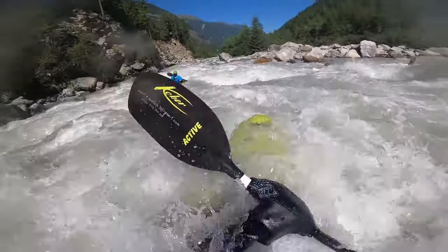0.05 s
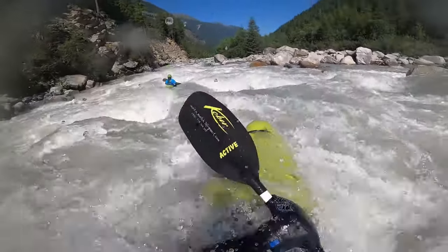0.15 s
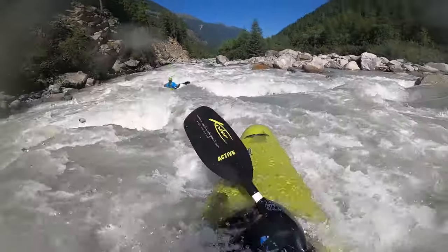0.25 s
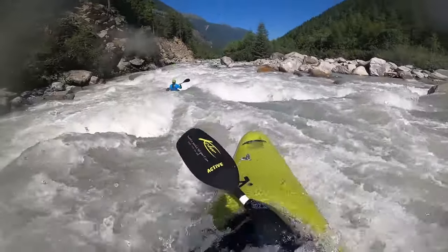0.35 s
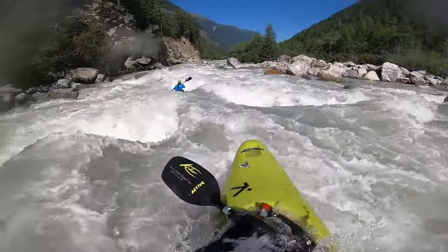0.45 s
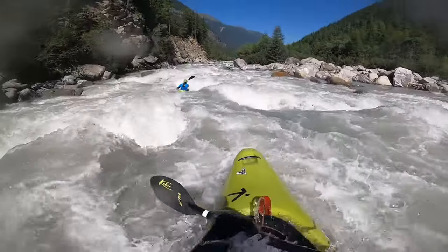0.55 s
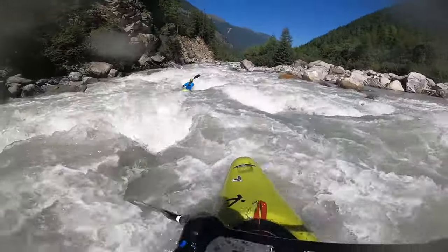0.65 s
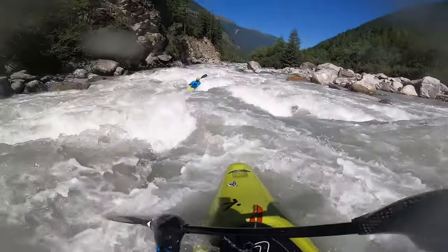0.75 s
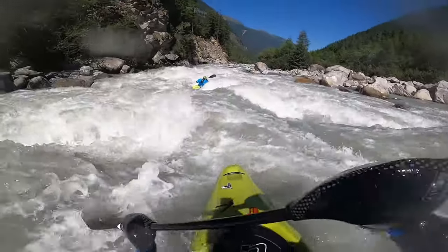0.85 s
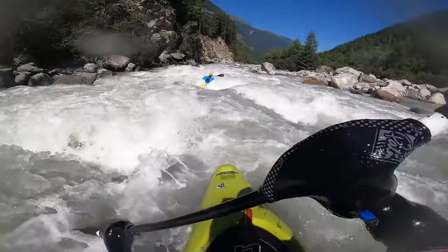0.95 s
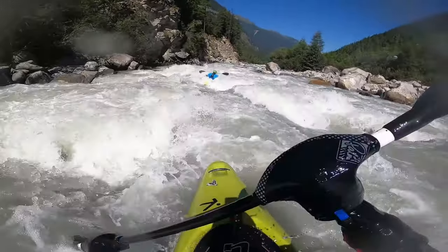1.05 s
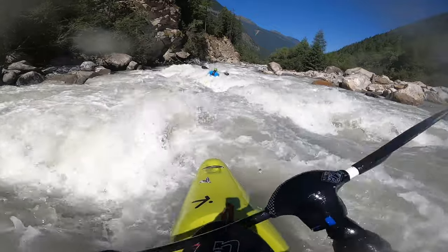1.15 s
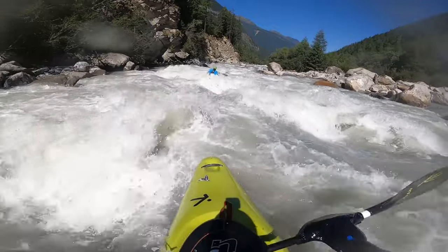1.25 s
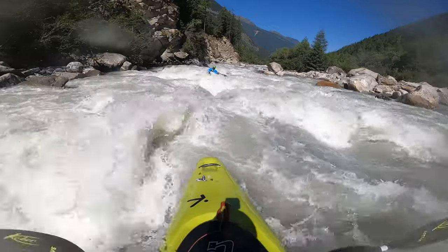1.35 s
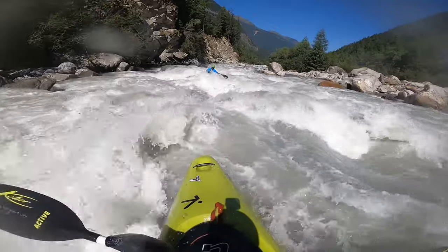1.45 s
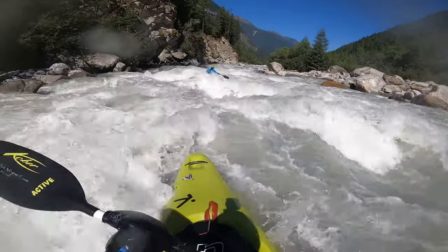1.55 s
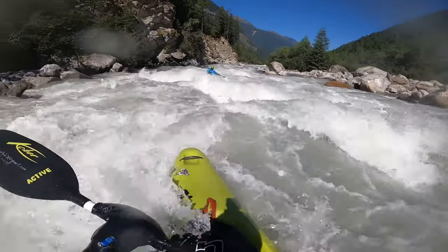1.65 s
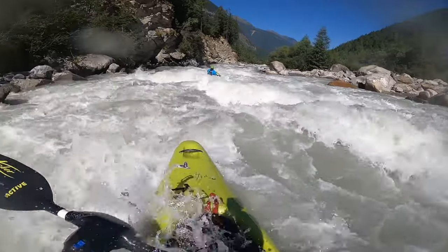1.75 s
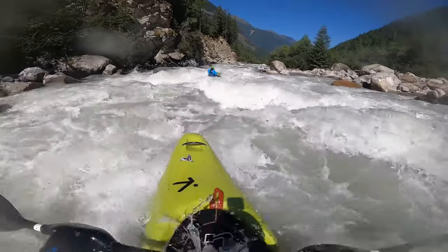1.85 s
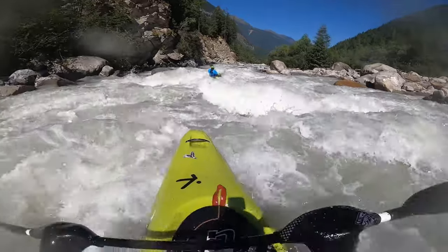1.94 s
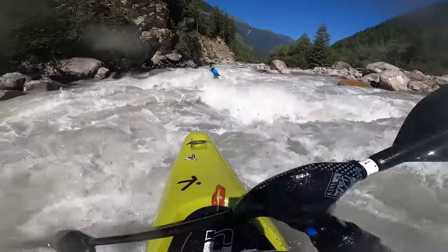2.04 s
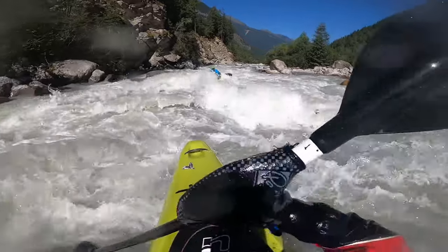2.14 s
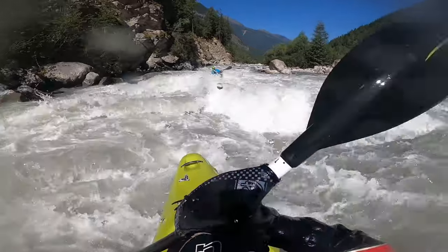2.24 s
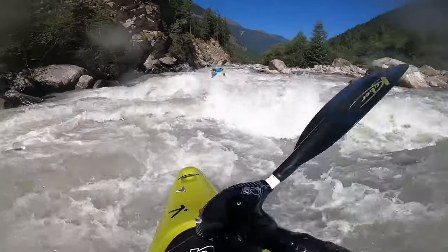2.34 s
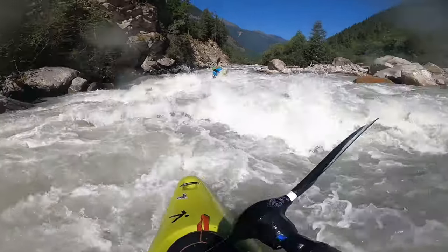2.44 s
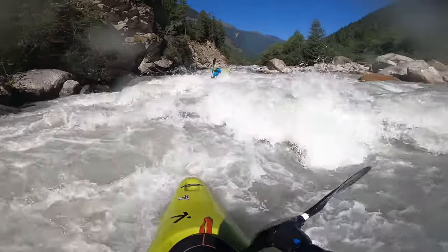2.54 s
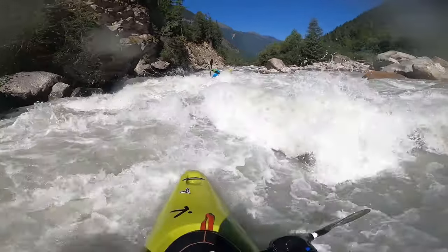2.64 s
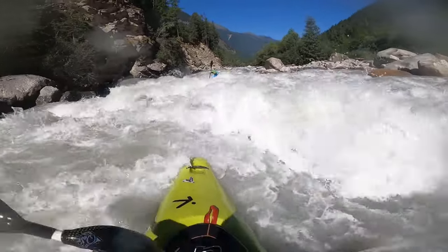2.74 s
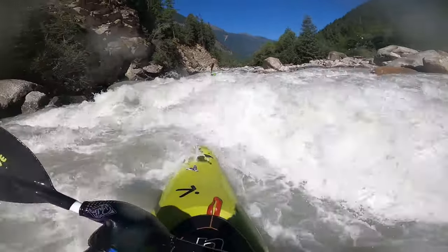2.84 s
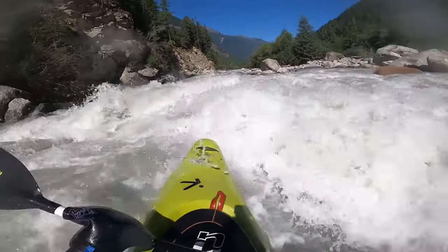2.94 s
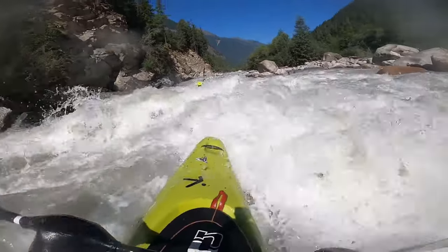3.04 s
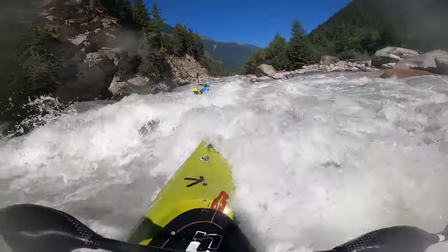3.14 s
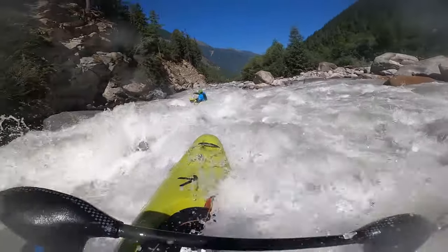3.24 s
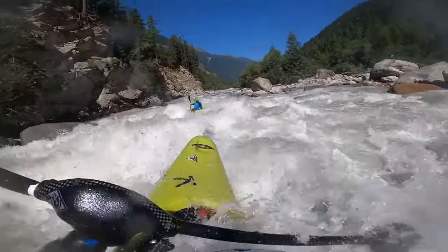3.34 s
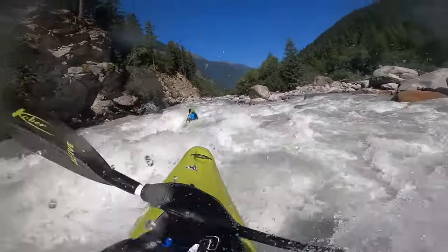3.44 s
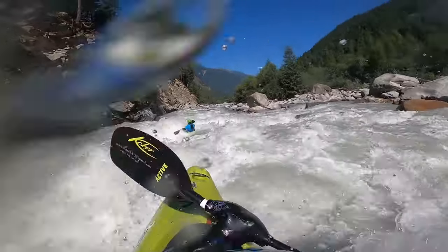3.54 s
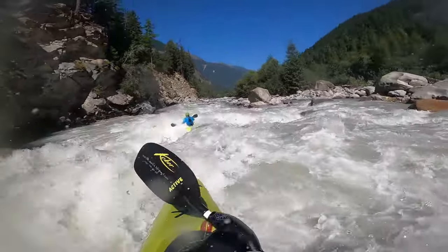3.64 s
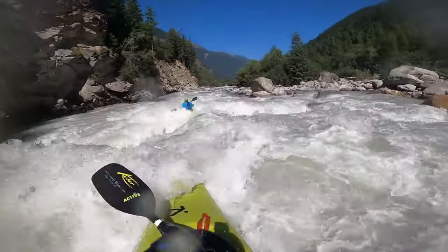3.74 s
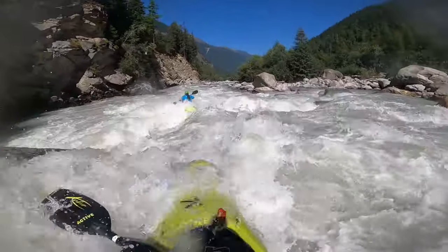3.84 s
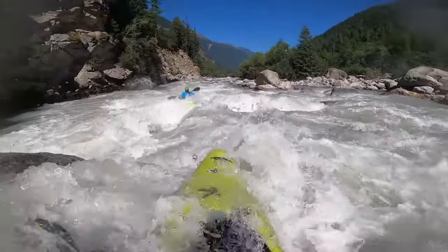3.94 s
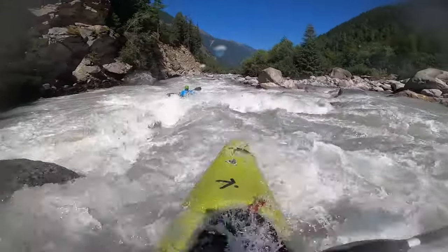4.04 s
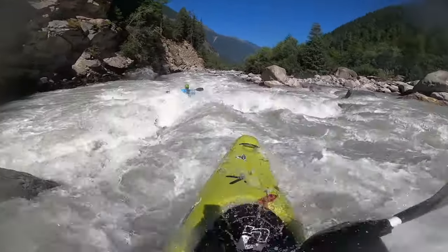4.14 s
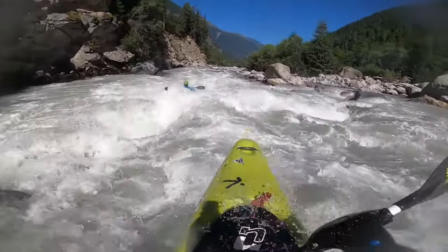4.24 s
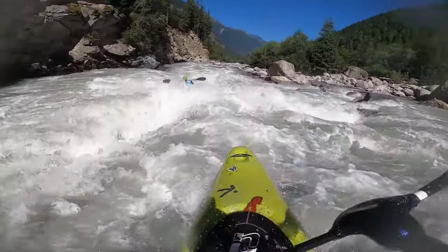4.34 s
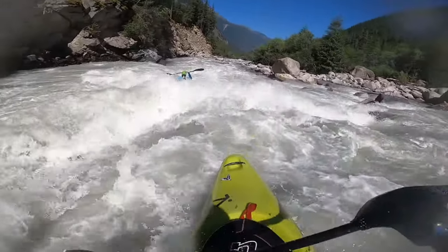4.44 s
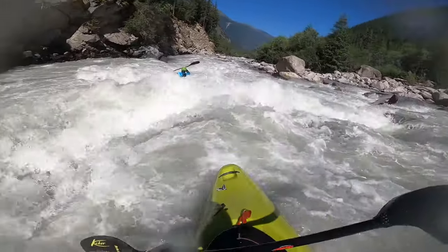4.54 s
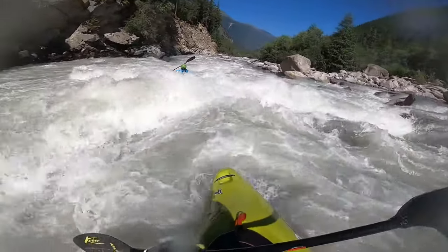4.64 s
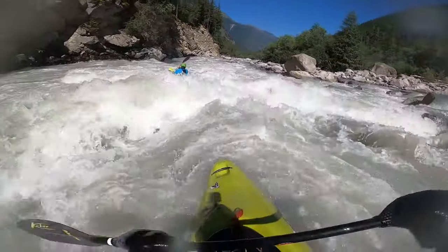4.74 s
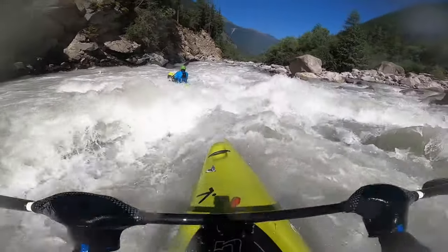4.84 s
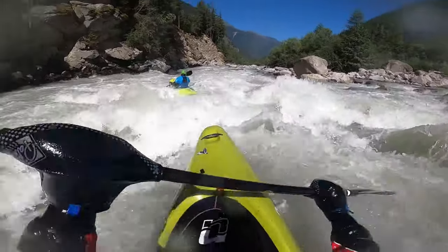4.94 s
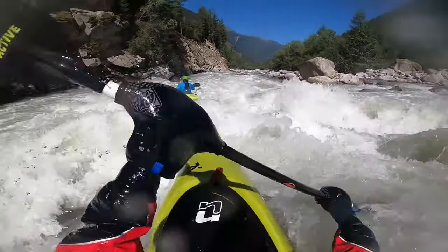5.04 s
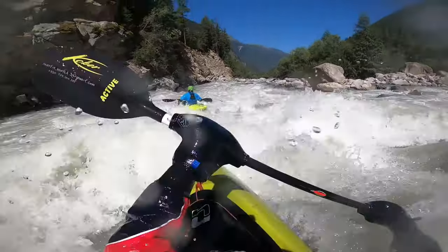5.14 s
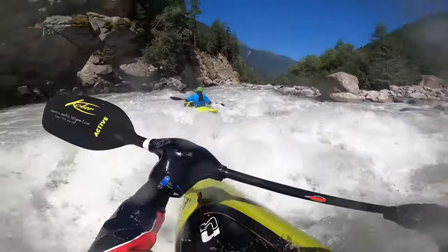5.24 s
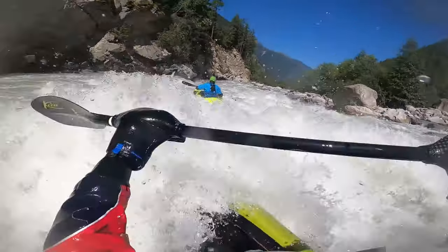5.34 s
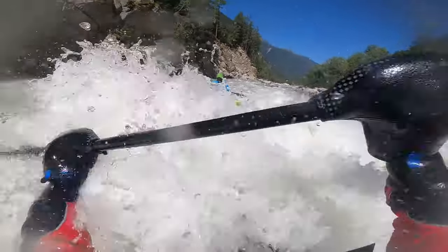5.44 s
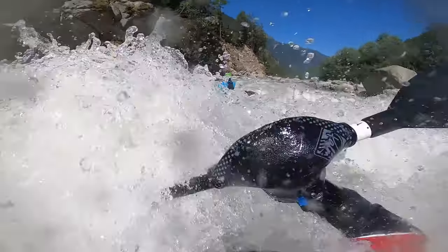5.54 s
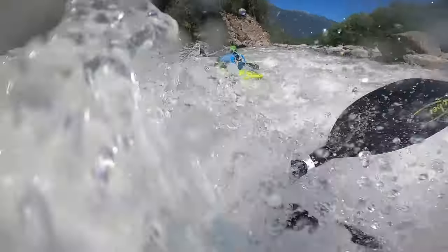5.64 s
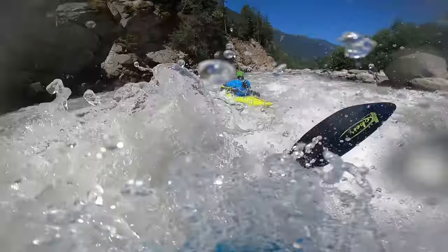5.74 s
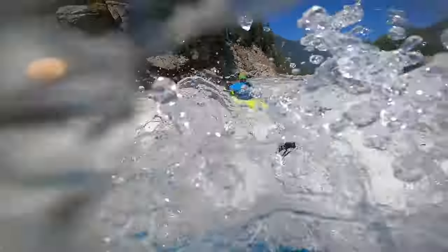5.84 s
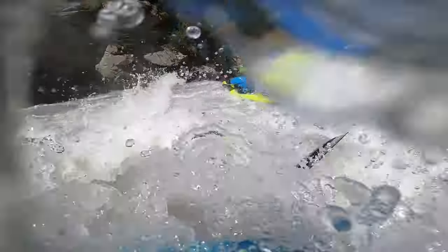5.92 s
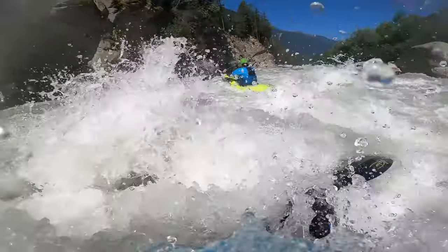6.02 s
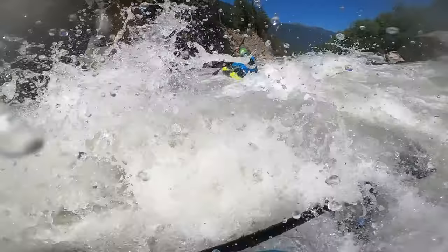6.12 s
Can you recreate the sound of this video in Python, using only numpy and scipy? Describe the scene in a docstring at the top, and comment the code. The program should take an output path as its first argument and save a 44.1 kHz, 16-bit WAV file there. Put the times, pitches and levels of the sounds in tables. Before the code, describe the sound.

A body-worn microphone in a waterproof case rides down whitewater outdoors. Rushing water dominates, hissing and slightly boxy, with a small knock at the start, low wind flutter and breaking waves beside the boat. Near the end a heavy slap is followed by dense irregular thuds, splatter, ringing drops and bubbling run-off, and the river becomes muffled and sinks away.

```python
"""A rapid roars and fizzes around a kayak: shaped noise plus clicks, ringing through a sealed microphone housing.
Water slaps (noise bursts) and drops (short rising tones) hit the housing; spray hisses and trapped air gurgles.
Wind throbs and flutters as narrow bands of low noise, and waves break beside the boat as pitched foam.
The roar dips and dulls at the plunge, comes back, then turns dull and sinks at the end.
After each hard slap the gain control pulls everything above the bass down and lets it return."""
import sys
import numpy as np
from scipy import signal
from scipy.fft import rfft, irfft, next_fast_len
from scipy.io import wavfile
from scipy.ndimage import uniform_filter1d

SR = 44100
rng = np.random.default_rng(int(sys.argv[2]) if len(sys.argv) > 2 else 0)


def dump_mix(stems):
    """Bounce the given channels to the path in sys.argv[1] as a 16-bit WAV at rate SR."""
    frames = np.atleast_2d(stems).T  # one column per channel
    limited = np.clip(frames, -1, 1)  # hard clip at full scale
    pcm = np.round(limited * 32767).astype(np.int16)
    wavfile.write(sys.argv[1], SR, pcm)


N = 272538   # length in samples

# Levels in the tables are those of each layer before the housing, the mix and the gain control.
# The rapid over time, with a dip at the plunge and a dull end: t/s, roar level/dB, extra treble level/dB
RAPID_CURVE = [(0, -28.5, 6.5), (.12, -29.5, 1.5), (.4, -33, 1.5), (.8, -31, 2), (1.15, -30.5, -1),
               (1.45, -27.5, 2.5), (1.75, -28, 3), (2.1, -29, 1), (2.6, -30.5, 0.5), (3.0, -29, 3.5),
               (3.4, -26, 2.5), (3.65, -32, 3), (4.1, -31, 2.5), (4.35, -31.5, 1.5), (4.7, -28.5, 2.5),
               (5.18, -28.5, 1.5), (5.21, -36.5, -3), (5.3, -34.5, 3), (5.45, -32, 2.5), (5.7, -27, 1),
               (5.88, -23.5, -6), (6.0, -33.5, -5), (6.18, -37.5, -6)]
# Tone colour of the rapid: f/Hz, relative level per Hz/dB
RAPID_COLOUR = [(60, -4.5), (158, 2), (420, -2.5), (500, 0), (800, -11.5), (1500, -13), (2700, -16),
                (3800, -24.5), (5000, -22), (7600, -42.5), (8600, -51), (10000, -47), (11200, -52),
                (13000, -55), (14600, -65), (15600, -77)]
# Water slapping the housing: t of the main contact/s, body level/dB, hollow thud level/dB,
# splatter level/dB, time to die by 60 dB/s
SLAP_EVENTS = [(.094, -21, -13, -50, .02), (4.123, -21, -34, -45, 0.027), (5.182, -16.5, -35, -37, 0.07),
               (5.188, 0.5, -0.5, -26, 0.024), (5.347, -19, -16.5, -32, 0.039),
               (5.512, -16, -12.5, -30, 0.015), (5.522, -14, -8.5, -35, 0.066),
               (5.526, -22, -22, -39, 0.013), (5.549, -6, -3.5, -19, 0.018), (5.569, -8, -10, -31, .018),
               (5.605, -12, -22, -47, 0.058), (5.613, -5, -3, -48, 0.038), (5.618, -1, -5, -52, 0.0089),
               (5.642, -3, 4, -50, .015), (5.663, -7.5, -13, -39, 0.044), (5.728, -7, -20, -44, 0.033),
               (5.741, 1, -5, -41, 0.014), (5.752, -3, -22, -37, 0.067), (5.788, -9, -28, -13, 0.014),
               (5.797, -6, 3.5, -22, 0.032), (5.812, -10, -26, -44, 0.03), (5.851, -10, -12, -44, .021),
               (5.868, -14, -28, -45, 0.036), (5.9, -12, -12, -42, 0.058), (5.913, -7.5, -3, -37, 0.03),
               (5.924, -12, -22, -19, 0.043), (5.947, -28, -8.5, -28, 0.024), (5.965, -23, -8, -19.5, .032),
               (5.988, -21, -19, -32, 0.018), (6.052, -11.5, -8.5, -57, 0.022),
               (6.116, -25, -31, -40, 0.039), (6.131, -22.5, -20, -40, 0.035),
               (6.152, -38, -23, -42, 0.016)]
# Bands of a slap, in the order body, thud, splatter, tick: lowest f/Hz, highest f/Hz
SLAP_BANDS = [(860, 2950), (330, 740), (3580, 6500), (8300, 12100)]
# Sheets of spray over the housing: t/s, length/s, droplets level/dB, gurgle level/dB
SPRAY_SHEETS = [(5.342, 0.11, -52, -42), (5.504, 0.031, -37, -28), (5.546, 0.039, -34, -20.5),
                (5.606, .02, -49, -17), (5.675, 0.049, -62, -27), (5.725, 0.055, -25, -15.5),
                (5.785, 0.016, -12.5, -16), (5.803, .01, -16, -13), (5.84, 0.037, -37, -21),
                (5.895, .03, -45, -18), (5.922, 0.043, -31, -29.5), (5.975, 0.071, -56.5, -24),
                (6.04, 0.081, -53, -30), (6.115, 0.084, -51, -28.5)]
# Tone colour of the droplets: f/Hz, relative level per Hz/dB
DROPLET_COLOUR = [(300, -33), (1500, 5), (3500, 3), (6500, -15), (8500, -36), (14000, -37)]
# Single drops and lumps of water that ring at their own pitch: t/s, level/dB, starting f/Hz
RINGING_DROPS = [(0.094, -4, 603), (0.1, 0.5, 81), (3.674, -19, 2640), (3.673, -19, 3930),
                 (5.191, 7.5, 146), (5.263, 0, 75.5), (5.38, -25, 1750), (5.409, -18, 1720),
                 (5.512, -3.5, 680), (5.643, 12.5, 330), (5.57, -4.5, 3000), (5.726, -15, 4260),
                 (5.727, -4, 1230), (5.851, -4, 1450), (5.914, -14, 1240), (5.849, -21, 5500),
                 (5.87, -18, 4280), (6.034, -4.5, 135), (6.084, -14, 300), (6.134, -16, 305),
                 (6.166, -18.5, 2600)]
# Gusts that set the deep throb going: t/s, length/s, level/dB
WIND_GUSTS = [(0.05, 0.015, -22), (.14, 0.016, -15.5), (0.25, 0.025, -19.5), (0.376, 0.023, -24.5),
              (0.53, 0.086, -30), (1.067, 0.033, -20), (1.255, 0.028, -27), (1.42, 0.016, -24),
              (1.74, .1, -34), (2.195, 0.097, -24), (2.406, 0.027, -22), (2.865, 0.17, -24.5),
              (3.315, 0.03, -17.5), (3.447, 0.13, -14.5), (3.672, 0.032, -20), (3.832, 0.16, -24.5),
              (4.144, 0.031, -21.5), (4.253, 0.022, -20), (4.627, .38, -24), (5.055, 0.027, -13.5),
              (5.186, 0.047, -11.5), (5.387, 0.075, -14), (5.555, 0.14, -12), (5.793, .13, -13.5),
              (6.028, 0.045, -19)]
# Buffets of flutter: t/s, length/s, level/dB
WIND_BUFFETS = [(0.005, 0.0089, -26.5), (0.103, 0.017, -20), (.27, .01, -30), (1.396, 0.74, -34),
                (3.243, .03, -33), (3.46, 0.018, -26), (5.182, 0.012, -13.5), (5.264, 0.012, -20),
                (5.434, 0.011, -25.5), (5.576, .01, -12.5), (5.65, 0.0081, -13), (5.75, 0.0094, -9.5),
                (5.776, 0.04, -12), (5.92, 0.022, -17.5), (6.044, 0.012, -16.5)]
# Waves breaking beside the boat: t/s, length/s, level/dB, f of the fizz/Hz
BREAKING_WAVES = [(1.45, .38, -40.5, 2320), (2.2, .1, -47, 2300), (3.044, 0.12, -57, 4500),
                  (3.223, 0.23, -44, 3210), (3.353, 0.076, -42, 1700), (4.8, 0.39, -47.5, 2350)]
# Resonances of the housing: f/Hz, width/Hz, lift (a dip if negative)/dB
HOUSING_MODES = [(1096.6, 134, 10), (1220.4, 119, 13), (1535, 200, -0.5), (1715, 176, 5.5),
                 (2600, 480, 0.5), (2800, 220, -4), (3160, 360, 5.5), (4274, 270, 5.5), (4984, 300, -10),
                 (5160, 180, 4), (7500, 430, 5.5)]

FIZZ_PER_S, FIZZ_DB = 1500, -9.5
BASS_DB, BASS_SWELL_DB = -1.93, 0.7
BASS_HOLDBACK = 0.15   # share of the roar's swing, in dB, that the bass does not follow
SLAP_BUILD_S, TICK_BELOW_SPLATTER_DB = 0.0043, 13.5   # a slap builds 20 dB in this time
GURGLE_PER_S = 730
SHEET_RISE_S, DROPLETS_T60_S, GURGLE_T60_S = 0.014, 0.06, 0.17
DROP_T60_S, DROP_CYCLES = 0.009, 4.8   # a ring dies by 60 dB in this time plus so many cycles
THROB_HZ, THROB_WIDTHS_HZ = 33.1, (12.5, 21.3)
GUST_RISE_S, GUST_T60_S, BREEZE_DB = 0.078, 0.28, -37
FLUTTER_BAND_HZ, FLUTTER_DB, FLUTTER_SWING_DB = [58.4, 169], -40, 2.5
BUFFET_RISE_S, BUFFET_T60_S = 0.014, 0.13
BREAKER_RISE_S, BREAKER_T60_S, BREAKER_WIDTH_HZ = 0.18, 0.6, 500
THRESHOLD_DB, ATTACK_S = -13.5, 0.0063
SQUEEZE = 0.69   # dB of cut per dB above the threshold
PEAK_FALL_DB_PER_S = 125   # how fast the held peak level sinks
CUTOFF_HZ = 15700


def from_db(db):
    """Decibels to gain."""
    return 10 ** (np.asarray(db) / 20)


def rms_one(x):
    """Scale to an rms (average strength) of 1."""
    return x / np.sqrt(np.mean(x ** 2) + 1e-20)


def in_time(rows):
    """Draw each column of a time table as a curve with a value at every sample."""
    s, *columns = np.transpose(rows)
    return [np.interp(np.arange(N) / SR, s, column) for column in columns]


def drift(rate_hz):
    """Slow random wander of rms 1: coarse noise through two one-pole low-passes at this rate."""
    step = 40   # one coarse value per 40 samples
    r = np.exp(-2 * np.pi * rate_hz * step / SR)
    noise = rng.standard_normal(N // step + 2002)
    slow = signal.lfilter([1], [1, -2 * r, r * r], noise)[2000:]   # skip the settling
    return np.interp(np.arange(N) / step, np.arange(len(slow)), rms_one(slow))


def swells(starts, lengths, levels_db, rise, t60):
    """Gain of events that climb 20 dB per rise time until their start, hold and die away; powers add."""
    t, power = np.arange(0, N + 16, 16) / SR, 0
    for s, length, level_db in zip(starts, lengths, levels_db):
        climb_db = np.minimum(0, 20 * (t - s) / rise)
        decay_db = 60 * np.maximum(0, t - s - length) / t60
        power = power + from_db(level_db + climb_db - decay_db) ** 2
    return np.interp(np.arange(N) / SR, t, np.sqrt(power))


def butter(x, hz, kind, order=2):
    """Butterworth filter: passes its band evenly."""
    return signal.sosfilt(signal.butter(order, hz, kind, fs=SR, output="sos"), x)


def coloured(x, spectrum):
    """Shape a signal by a spectrum drawn on a log-frequency axis; rms 1."""
    size = next_fast_len(N)
    hz, db = np.transpose(spectrum)
    log_hz = np.log(np.arange(size // 2 + 1) * SR / size + 1)   # +1 avoids log(0)
    gain = from_db(np.interp(log_hz, np.log(hz), db))
    return rms_one(irfft(rfft(x, size) * gain, size)[:N])


def grains(per_s, spread_db):
    """Random clicks, many small and a few large; rms 1."""
    sizes = from_db(spread_db * np.minimum(rng.exponential(1, N), 4.0))
    signs = rng.choice([-1, 1], N)
    return rms_one(sizes * signs * (rng.random(N) < per_s / SR))


def resonance(x, hz, width_hz):
    """Two-pole band-pass that rings at one pitch, with gain 1 on top."""
    r = np.exp(-np.pi * width_hz / SR)
    feedback = [1, -2 * r * np.cos(2 * np.pi * hz / SR), r * r]
    return signal.lfilter(np.array([1, 0, -1]) * (1 - r * r) / 2, feedback, x)


def rapid():
    """Far roar plus near bursting foam; bass, middle and treble swell together and a little on their own."""
    roar_db, treble_db = in_time(RAPID_CURVE)
    foam = from_db(FIZZ_DB + 5.0 * drift(6.2)) * grains(FIZZ_PER_S, spread_db=4.5)
    water = coloured(rng.standard_normal(N) + foam, RAPID_COLOUR)
    bass, treble = butter(water, 400, "low"), butter(water, 2040, "high")
    middle = water - bass - treble
    surge_db = 0.27 * drift(1.7)
    bass_db = BASS_DB - BASS_HOLDBACK * (roar_db - roar_db.mean())
    bass_db = bass_db + BASS_SWELL_DB * drift(2.8) + 3.9 * drift(8.8)
    treble_db = treble_db + 1.3 * surge_db + 0.57 * drift(42)
    parts = bass * from_db(bass_db) + middle * from_db(surge_db) + treble * from_db(treble_db)
    return from_db(roar_db) * parts


def slaps():
    """Each slap is a burst of noise that builds and dies, with its own share of body, thud and splatter."""
    out, lead = np.zeros(N), int(0.05 * SR)
    t = np.arange(-lead, 2 * lead) / SR   # 0 at the main contact
    for s, body_db, thud_db, splatter_db, t60 in SLAP_EVENTS:
        burst = rng.standard_normal(len(t))
        burst[lead] += 6.0   # the crack of the main contact
        burst = burst * from_db(np.where(t < 0, 20 * t / SLAP_BUILD_S, -60 * t / t60))
        at = round(s * SR) - lead
        levels_db = [body_db, thud_db, splatter_db, splatter_db - TICK_BELOW_SPLATTER_DB]
        for level_db, band in zip(levels_db, SLAP_BANDS):
            part = butter(burst, band, "band", order=5)
            part = from_db(level_db) * part / np.abs(part).max()
            out[at:at + len(t)] += part[:N - at]
    return out


def spray():
    """Dense droplets in uneven sheets, and trapped air gurgling in the water that runs off."""
    s, length, droplets_db, gurgle_db = np.transpose(SPRAY_SHEETS)
    droplets = coloured(rng.standard_normal(N) + 0.7 * grains(2500, spread_db=4), DROPLET_COLOUR)
    droplet_gain = swells(s, length, droplets_db, SHEET_RISE_S, DROPLETS_T60_S) * from_db(5.0 * drift(44))
    # each pop of air is dealt at random to one of 14 bubble pitches
    pops, dealt = grains(GURGLE_PER_S, spread_db=5), rng.integers(0, 14, N)
    gurgle = np.zeros(N)
    for k, hz in enumerate(np.geomspace(240, 3800, num=14)):
        bubble = resonance(pops * (dealt == k) + 1e-18, hz, hz / 5.9)
        bubble = resonance(bubble, hz, hz / 6.1)   # the second pass gives a soft start
        gurgle += bubble * (600 / hz) ** 1.52   # more weight on low bubbles
    gurgle_gain = swells(s, length, gurgle_db, SHEET_RISE_S, GURGLE_T60_S)
    return droplet_gain * droplets, gurgle_gain * rms_one(gurgle)


def drops():
    """Each drop rings with a soft start, a pitch that rises a little and a quick death."""
    out, t = np.zeros(N), np.arange(int(0.15 * SR)) / SR
    for s, level_db, hz in RINGING_DROPS:
        at, t60 = round(s * SR), DROP_T60_S + DROP_CYCLES / hz
        tone = np.sin(2 * np.pi * hz * t * (1 + 4.2 * t))
        soft_start = 1 - np.exp(-t * hz / 0.53)   # time constant of about half a cycle
        ring = tone * soft_start * from_db(level_db - 60 * t / t60)
        out[at:at + len(t)] += ring[:N - at]
    return out


def wind():
    """Pressure lumps on the microphone: a narrow deep throb and a broader flutter above it."""
    throb = rng.standard_normal(N)
    for width_hz in THROB_WIDTHS_HZ:
        throb = resonance(throb, THROB_HZ, width_hz)
    # the throb's own swelling is evened out, so that the gusts set its strength
    throb = throb / np.sqrt(uniform_filter1d(throb ** 2, size=2600) + 0.07 * np.mean(throb ** 2))
    flutter = butter(rng.standard_normal(N), FLUTTER_BAND_HZ, "band", order=3)
    breeze = from_db(BREEZE_DB + 3.0 * drift(7.8))
    gusts = np.hypot(breeze, swells(*np.transpose(WIND_GUSTS), GUST_RISE_S, GUST_T60_S))
    steady = from_db(FLUTTER_DB + FLUTTER_SWING_DB * drift(7.2))
    buffets = np.hypot(steady, swells(*np.transpose(WIND_BUFFETS), BUFFET_RISE_S, BUFFET_T60_S))
    return butter(gusts * rms_one(throb), 48, "low", order=4) + buffets * rms_one(flutter)


def breakers():
    """Bursting foam of each wave, heard through a broad resonance, swells and sinks."""
    foam = rng.standard_normal(N) + 0.28 * grains(FIZZ_PER_S, spread_db=0.0)
    out = np.zeros(N)
    for s, length, level_db, hz in BREAKING_WAVES:
        fizz = resonance(resonance(foam, hz, BREAKER_WIDTH_HZ), hz, BREAKER_WIDTH_HZ)
        out += swells([s], [length], [level_db], BREAKER_RISE_S, BREAKER_T60_S) * rms_one(fizz)
    return out


def housing(x):
    """Each resonance of the sealed housing lifts or dips the sound around its own pitch."""
    for hz, width_hz, lift_db in HOUSING_MODES:
        x = x + (from_db(lift_db) - 1) * resonance(x, hz, width_hz)
    return x


def scene():
    """Airborne water comes through the housing; blows, gurgle, drops and wind arrive more directly."""
    droplets, gurgle = spray()
    blows = slaps() + gurgle
    through_housing = housing(rapid() + breakers() + droplets + 0.55 * blows)
    return (through_housing + 0.33 * blows + drops() + wind())[None]


def record(dry):
    """Gain control on the band above the bass, rounded peaks, steep top cut."""
    bass = butter(dry, 158, "low")
    upper = dry - bass
    peak_db = 20 * np.log10(np.abs(butter(dry[0], 655, "high")) + 1e-6)
    # hold each peak and let it sink in a straight line in dB
    fall_db = PEAK_FALL_DB_PER_S * np.arange(N) / SR
    held_db = np.maximum.accumulate(peak_db + fall_db) - fall_db
    over_db = np.maximum(held_db - THRESHOLD_DB, 0)
    keep = np.exp(-1 / (ATTACK_S * SR))
    cut_db = SQUEEZE * signal.lfilter([1 - keep], [1, -keep], over_db)   # smooth the cut
    mixed = bass + upper * from_db(-cut_db)
    rounded = 1.6 * np.tanh(mixed / 1.6)
    return signal.sosfilt(signal.ellip(10, 1, 70, CUTOFF_HZ, fs=SR, output="sos"), rounded)


dry = scene()
out = record(dry)
dump_mix(out)
```